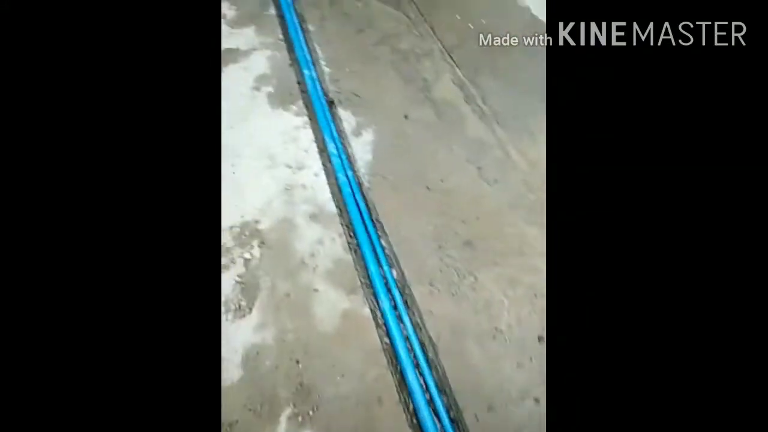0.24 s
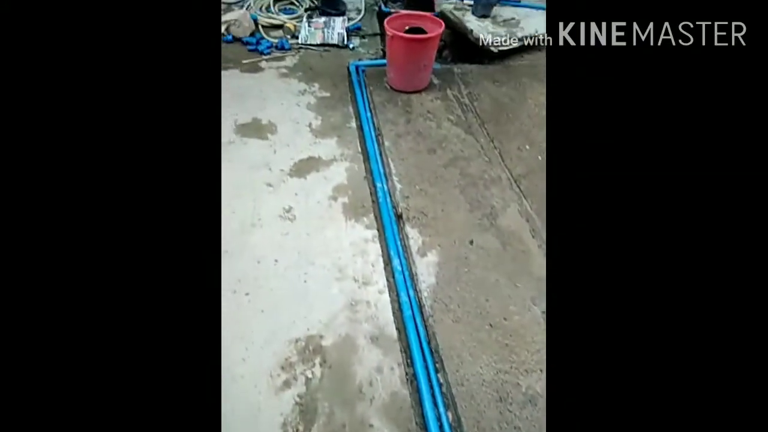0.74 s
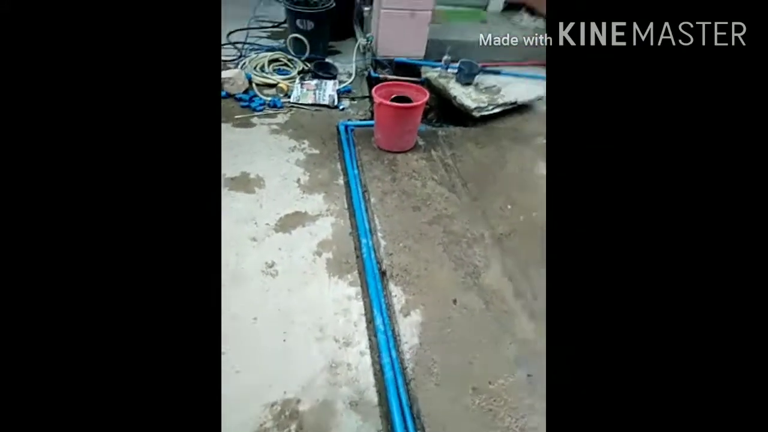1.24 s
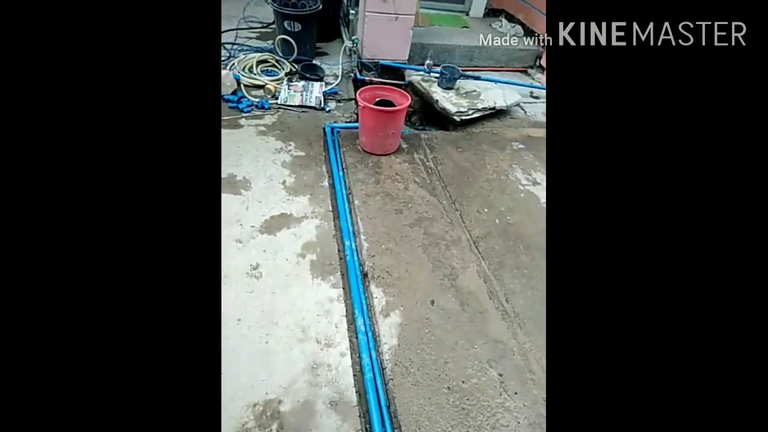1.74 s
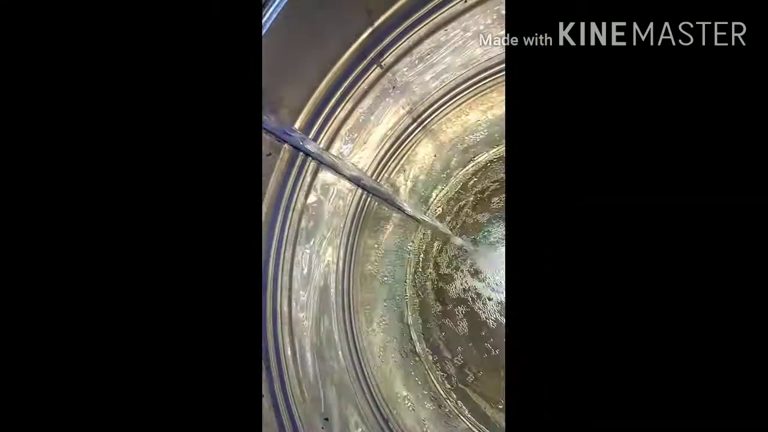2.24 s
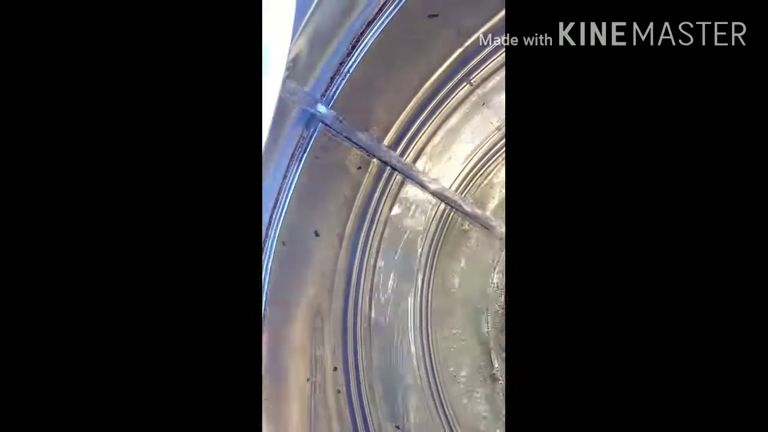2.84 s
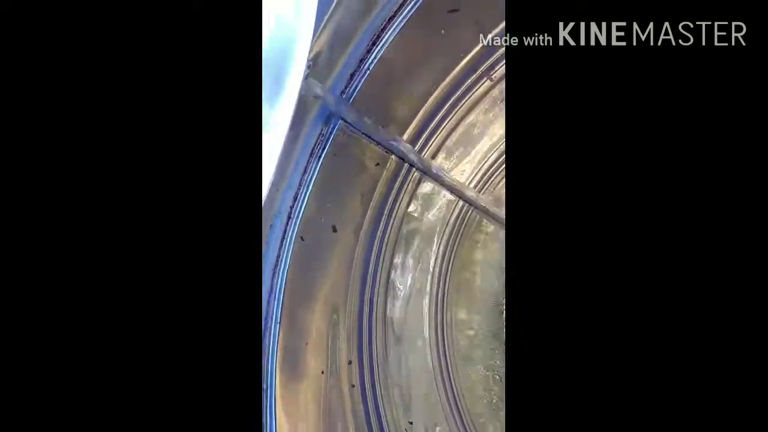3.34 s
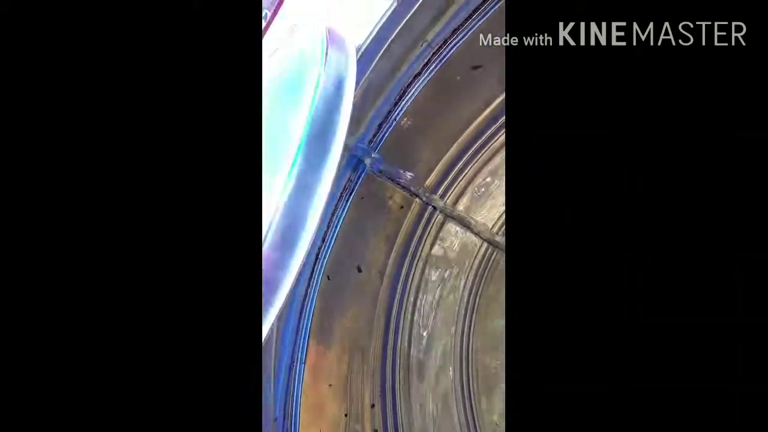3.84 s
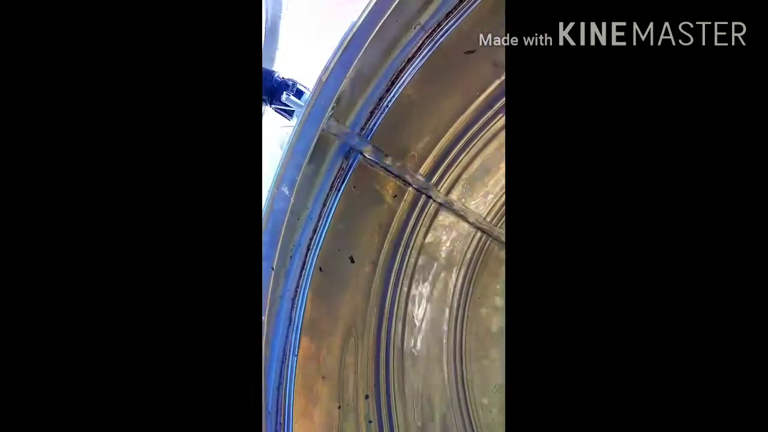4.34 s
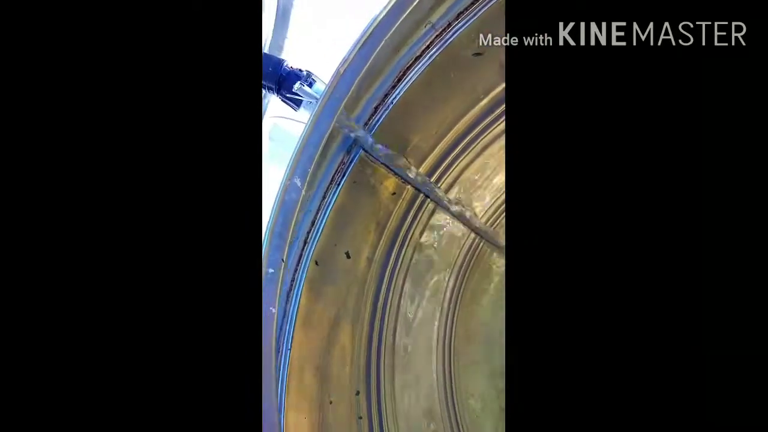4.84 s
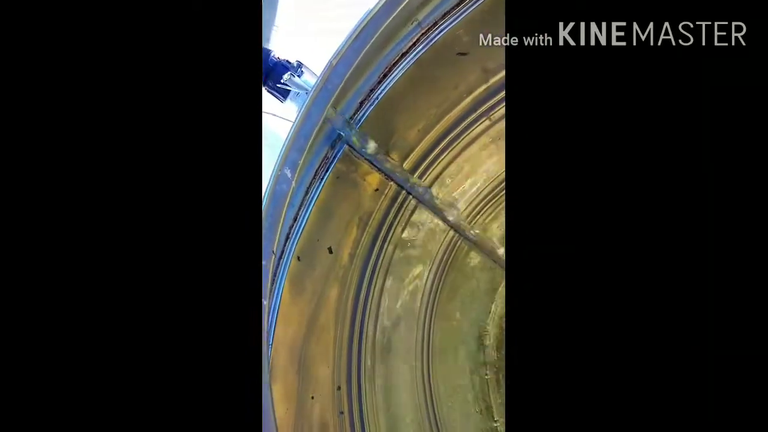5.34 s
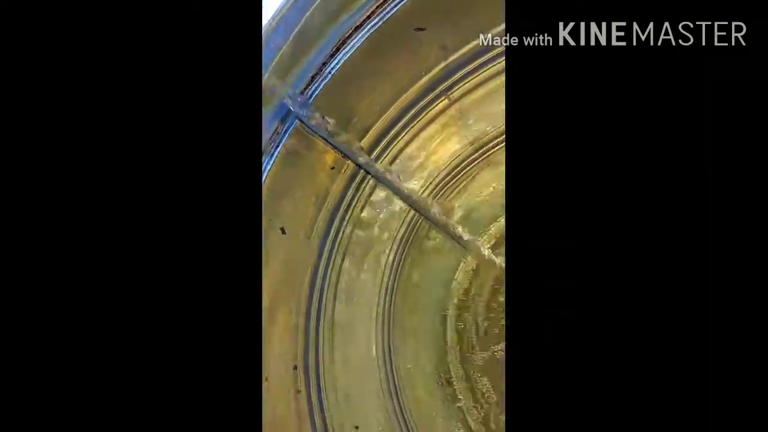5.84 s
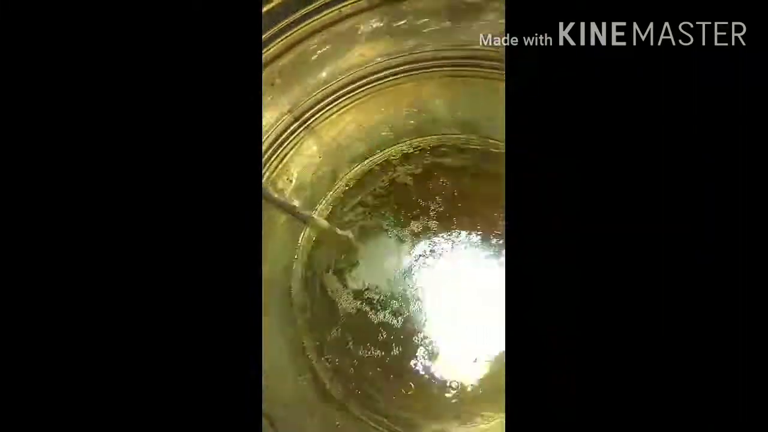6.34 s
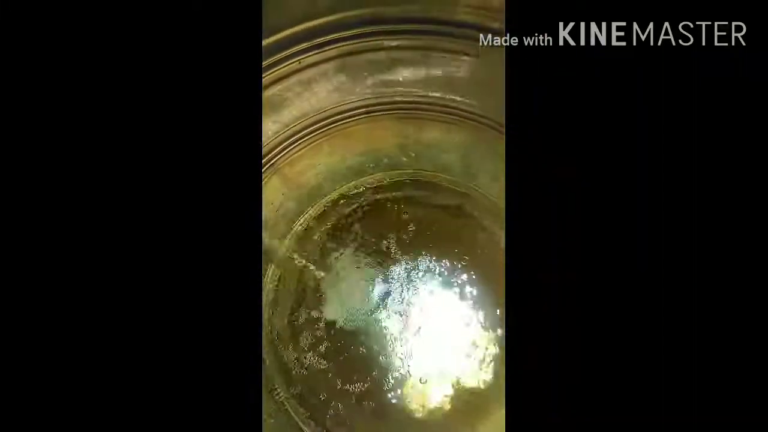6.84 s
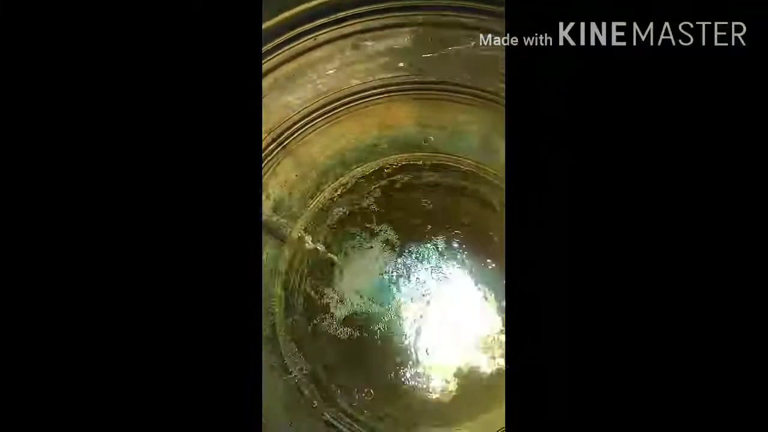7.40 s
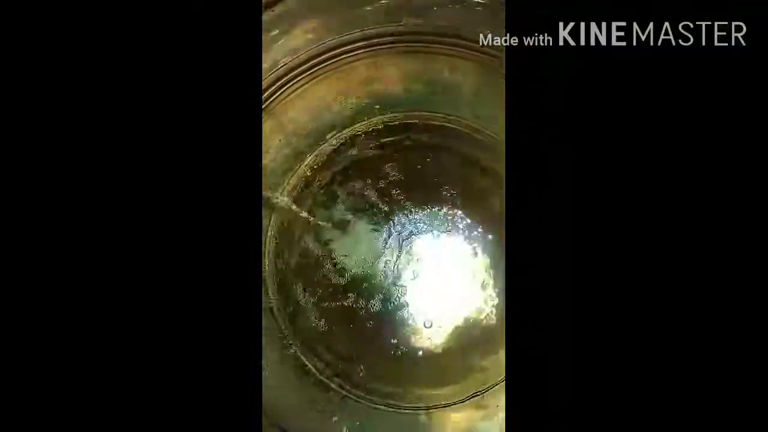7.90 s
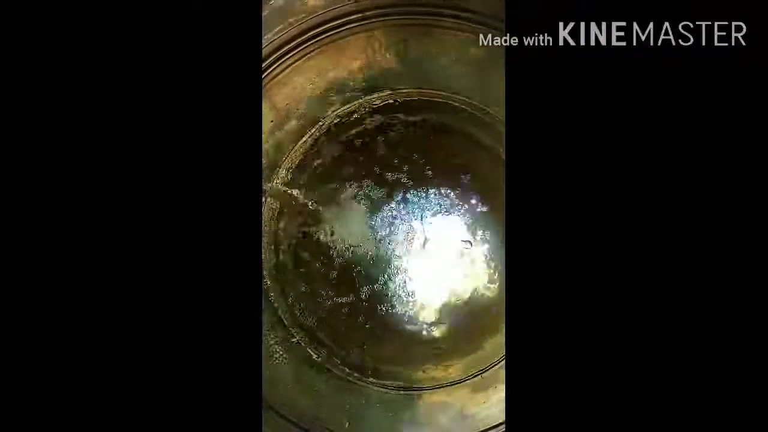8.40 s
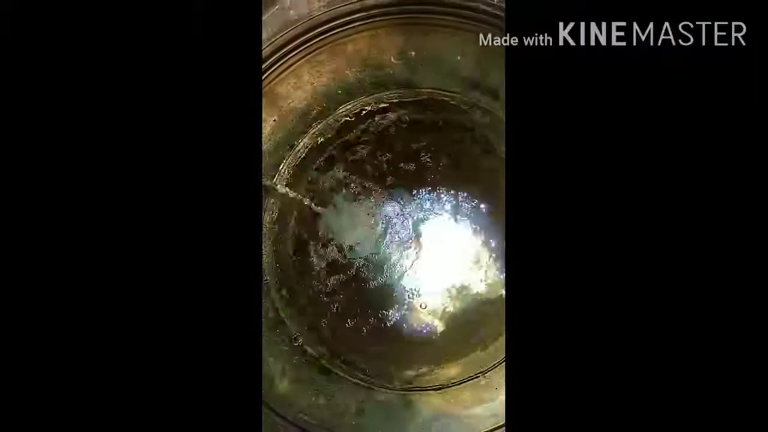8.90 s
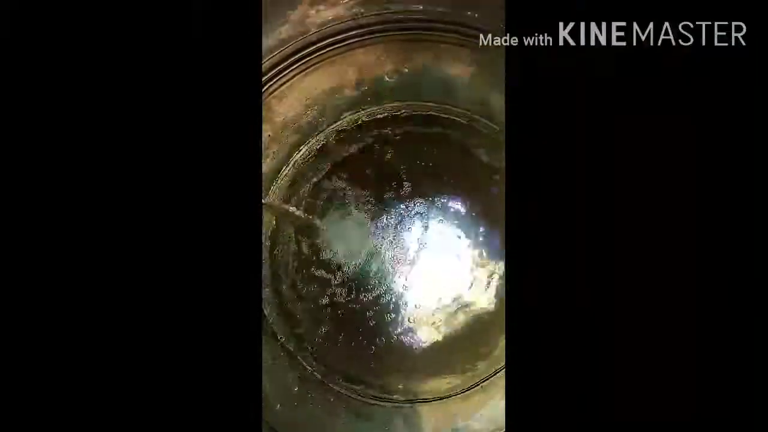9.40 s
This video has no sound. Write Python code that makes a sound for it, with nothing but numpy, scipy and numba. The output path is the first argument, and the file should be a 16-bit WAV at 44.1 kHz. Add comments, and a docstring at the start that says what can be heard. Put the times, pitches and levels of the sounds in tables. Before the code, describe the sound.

Soft mono hiss and far rumble with faint clicks last two seconds, then a short blank. Abruptly, close and wide, water plunges into a resonant metal tank: dense bright spray, uneven slaps, sudden airy gulps, sharp drop ticks near the phone, and a wavering low hum swelling with each plunge. Low wind buffets each side separately, growing into heavy thuds in the last few seconds. The splashing continues to the end.

```python
"""In a quiet yard, heard in mono: a water hiss turns away over distant rumble, with a few small taps.
After a short silence, stereo in the mouth of a steel tank, from the two microphone ports of a phone:
coloured noise makes the spray and slaps of a plunging jet, gliding tones its bubbles and close drops.
Band-passed noise and a wavering tone make the air in the tank sing and boom.
Low noise and falling tones make wind that buffets each port on its own."""
import sys
import numpy as np
from scipy import signal
from scipy.fft import rfft, irfft, next_fast_len
from scipy.io import wavfile
from scipy.ndimage import uniform_filter1d, minimum_filter1d
from numba import njit

SR = 44100
rng = np.random.default_rng(int(sys.argv[2]) if len(sys.argv) > 2 else 0)


def store_pcm(level_fs):
    """Save levels as 16-bit WAV."""
    pcm = np.round(np.clip(level_fs, -1, 1) * 32767).astype(np.int16)
    wavfile.write(sys.argv[1], SR, np.atleast_2d(pcm).T)


N = 426006

# Yard, distant murmur and water hiss: (time [s], murmur level [dB], hiss level [dB])
YARD_LEVELS = [(0, -39, -41), (.45, -41.5, -42.5), (.74, -43, -43), (.95, -41, -44), (1.4, -41.5, -44),
               (1.76, -42, -46), (1.94, -41.5, -44), (2.14, -41, -44.5)]
# Spectrum of the distant murmur: (frequency [Hz], relative density [dB per Hz])
MURMUR_SPECTRUM = [(18, -65), (30, -25), (106, -1.5), (168, -8), (281, -7.5), (401, -12), (550, -7),
                   (658, -10.5), (790, -1.5), (920, -11), (1180, -7), (1420, -13.5), (1950, -13),
                   (2200, -16), (2380, -11.5), (3400, -22), (4420, -39), (7480, -120)]
# Spectrum of the water hiss: (frequency [Hz], relative density [dB per Hz])
HISS_SPECTRUM = [(1800, -12), (2450, -25), (3200, 0), (3900, 2), (4200, -21), (4500, -1.5), (6000, 0),
                 (8000, 0.5), (11000, -2.5), (12500, -8), (15500, -13)]
# Bright band of the hiss, sweeping as the phone turns:
# (time [s], centre [Hz], width [Hz], band gain [dB], whistle gain [dB])
HISS_SWEEP = [(0, 10200, 1300, 9.5, 5.5), (.3, 9900, 1200, 10, 10), (.55, 10500, 1500, 10, 6),
              (.8, 10800, 1600, 2, 4), (1.0, 9900, 1500, 2, 2), (1.4, 10400, 1800, -1, -1),
              (1.7, 10100, 1200, 2, -1), (2.14, 9500, 1500, -5, -3)]
# Narrow whistles in the hiss: (centre [Hz], width [Hz], relative gain [dB])
HISS_WHISTLES = [(1440, 180, 4), (4160, 200, 2.5), (5840, 89, -7), (2360, 120, -9)]
# Small taps in the yard: (time [s], starting level [dB], starting pitch [Hz], T60 [s])
YARD_TAPS = [(0.296, -19, 3000, 0.002), (.297, -22, 4400, .002), (.785, -33, 1650, .02),
             (.80, -30, 1100, .012), (.803, -29, 1660, .02), (.815, -29, 1850, .012),
             (.827, -25, 1750, .015), (.829, -31, 1100, .008), (1.93, -30, 3100, .008),
             (1.961, -31, 2710, .008), (1.984, -32, 3020, .008), (2.029, -31, 2900, .008)]
WHISTLE_DRIFT, WHISTLE_WAVER_DB = .01, 2  # share of the pitch; level
YARD_END_S, TANK_START_S, TANK_FADE_S = 2.14, 2.268, .012

# Wind at the two ports: (time [s], relative left level [dB], relative right level [dB])
WIND_LEVELS = [(2.28, -59, -56), (2.45, -45, -31), (2.75, -43, -36), (3.1, -40, -34), (3.45, -52, -54),
               (3.8, -41, -37.5), (4.05, -30.5, -42.5), (4.25, -35, -28.5), (4.45, -39, -40),
               (4.58, -39, -36), (4.68, -27, -22.5), (4.78, -31, -28), (4.88, -40, -34), (5.0, -25, -22),
               (5.1, -33, -28), (5.22, -33, -27.5), (5.4, -42, -31), (5.58, -33, -27.5), (5.7, -32, -24.5),
               (5.82, -31, -26), (6.04, -33, -27.5), (6.3, -37, -43), (6.44, -33.5, -44), (6.75, -50, -38),
               (7.0, -29.5, -28), (7.24, -36, -31.5), (7.48, -26.5, -22), (7.7, -26.5, -28.5),
               (7.9, -29.5, -25.5), (8.2, -33.5, -29), (8.36, -28, -20.5), (8.56, -21.5, -17),
               (8.68, -27.5, -17), (8.8, -23.5, -40), (8.9, -30, -26.5), (9.0, -33, -25),
               (9.24, -32.5, -36), (9.4, -27.5, -20), (9.55, -34, -30), (9.66, -29, -30)]
# Strongest eddies against a port:
# (time [s], relative level [dB], starting pitch [Hz], port [0 left, 1 right])
WIND_POPS = [(2.658, -13, 294, 1), (4.139, -11, 237.2, 0), (4.171, -11, 318, 1), (4.26, -14, 275, 1),
             (4.662, -10, 250.7, 0), (4.663, -12, 217, 1), (4.733, -13, 280, 0), (4.895, -16, 255, 1),
             (4.968, -10, 228, 1), (5.014, -5, 130, 1), (5.065, -9, 140, 1), (5.107, -8, 190, 1),
             (5.2, -9, 200, 1), (5.46, -13, 300, 1), (5.657, -6, 198, 1), (5.675, -11, 298, 0),
             (5.732, -6, 207, 1), (6.002, -12, 241, 1), (6.994, -7, 403, 1), (7.385, -2.5, 256.7, 1),
             (7.461, -4, 324, 1), (7.532, -10, 195, 0), (7.533, -3, 229, 1), (7.615, -7.5, 317, 1),
             (7.671, -2, 317, 1), (7.708, -11, 248, 1), (7.825, -3, 240.3, 1), (7.86, -3, 235, 1),
             (7.935, -3.5, 226, 1), (8.048, -12, 246, 1), (8.162, -10, 240, 1), (8.178, -13, 260, 1),
             (8.257, -5.5, 230, 1), (8.358, -6, 294, 1), (8.377, -13, 204, 0), (8.478, -6, 334, 1),
             (8.505, -3, 245, 1), (8.527, -7, 317, 0), (8.562, -3, 332, 1), (8.625, 2, 278, 1),
             (8.673, -7, 335, 1), (8.79, -7, 204.4, 0), (8.799, -14, 250, 1), (8.9, -7, 251, 1),
             (8.98, -11, 260, 1), (9.179, -10, 260, 1), (9.31, -9, 250, 1), (9.359, -4, 285, 1),
             (9.388, -6, 293, 1), (9.435, -10, 230.4, 1), (9.524, -10, 232, 1)]
GUST_DB, GUSTS_PER_S = 1.24, 14  # chance gusts at each port
SMALL_POP_DB, SMALL_POP_HZ = 13, 198  # strongest small pop over the wind table, lowest starting pitch
POP_CYCLES = 5.6  # T60 of a pop, in cycles of its starting pitch
# each pop also throws a short rough puff
PUFF_DB, PUFF_HZ, PUFF_WIDTH_HZ, PUFF_T60_S = -11, 408, 490, 0.052

# Lowest air mode of the tank between swells: (time [s], pitch [Hz], relative level [dB])
BOOM_COURSE = [(2.27, 223, -37), (2.5, 220.8, -27), (3.1, 219.5, -34.5), (3.5, 223.7, -28.5),
               (4.3, 224, -30.5), (5, 225.9, -26), (5.6, 230.2, -30.5), (6.5, 229.7, -29),
               (7, 224.9, -28.5), (7.6, 232.4, -27.5), (8.3, 233.8, -36), (8.8, 224.8, -28.5),
               (9.66, 226.4, -26.5)]
# Swells of the boom as slugs of water plunge: (time of the top [s], relative level [dB])
BOOM_SWELLS = [(2.301, -32), (2.43, -24), (2.55, -21), (2.65, -21.5), (2.77, -19), (2.85, -33),
               (3.091, -20), (3.2, -20.5), (3.28, -20), (3.39, -15.5), (3.45, -22), (3.52, -32),
               (4.14, -22), (4.285, -19), (4.41, -29), (4.53, -28), (4.68, -18), (4.73, -24), (4.8, -22),
               (4.845, -24), (4.91, -27), (4.99, -21), (5.21, -25), (5.3, -23), (5.38, -26), (5.44, -26),
               (5.73, -28), (6.2, -23), (6.41, -29), (6.57, -21.5), (6.74, -17), (6.88, -27), (7.0, -29),
               (7.42, -17), (7.54, -27), (7.63, -24), (7.72, -27), (7.83, -34), (8.3, -21), (8.47, -13),
               (9.1, -30), (9.18, -25), (9.43, -23)]
SWELL_RISE_S, SWELL_FALL_S, BOOM_WANDER_DB = 0.02, 0.028, 2.5

# Single drops near the phone:
# (time [s], mean starting level [dB], starting pitch [Hz], left minus right [dB])
CLOSE_DROPS = [(2.9617, -2, 7560, 1), (3.162, -6, 7690, 0.5), (3.3062, -2, 7300, -1.0),
               (3.5062, -8, 7160, -1.5), (3.578, -3, 7500, -2.0), (3.8963, 0, 7200, 7),
               (4.0076, -4, 7910, -0.5), (4.26, -10, 6860, 1.0), (4.308, -7, 6000, 2.5),
               (4.4087, -3, 6920, 1.5), (4.4386, 1, 7600, 5), (4.657, -6, 6440, 2.0), (5.0522, -6, 8000, 3),
               (5.1086, -12, 6610, 1.5), (5.2188, -10, 7250, 1.5), (5.2837, -6, 7260, 3.0),
               (5.4218, -8, 5400, 3.0), (5.59, -10, 7420, 0.5), (5.6733, -8, 7360, 0.0),
               (5.75, -9, 5600, 1.5), (6.1302, -12, 7600, 1), (6.1781, -8, 5860, -1.5),
               (6.5104, -8, 7440, -0.5), (6.5812, -9, 6910, -1.0), (6.6491, -7, 7500, -2.5),
               (6.8908, -7, 5990, 4), (7.1584, -7, 8100, -0.5), (7.663, -7, 6400, 1),
               (8.449, -10, 7360, -1.5), (8.523, -6, 7200, -3.5), (8.5767, 2, 7540, -2.0),
               (8.6675, -9, 7240, -1.0), (8.9234, -2, 7540, -1.5), (9.08, -7, 7550, -3.5),
               (9.2043, -10, 6600, 0), (9.4537, -6, 5740, -1.5), (9.5101, -5, 7470, -7)]
DROP_T60_S, DROP_GLIDE = 0.011, 0.147
SPATTER_PER_S, SPATTER_DB, SPATTER_HZ = 40, -14, 5210  # chance drops: rate, top level, lowest pitch

# Higher air modes of the tank: (frequency [Hz], width [Hz], relative left level [dB],
# relative right level [dB], polarity of left against right [+1 or -1])
TANK_MODES = [(335, 17.4, 2.5, 2, 1), (439, 37, 1, -1.5, 1), (513, 18, -7, -3.5, 1), (556, 49, -3, -11, 1),
              (613, 44, -8.5, -18, 1), (675, 37, 0, 1, 1), (773, 24, -4, -8, 1), (843, 15, -10, -0.5, -1),
              (890, 11, -2, 0, -1), (959, 17, -19, -2.5, -1), (1081, 20, -25, 1, -1),
              (1154, 9.2, -5, -11, 1), (1244, 26, -2.5, -8, -1), (1342, 14, -10.5, 3.5, -1),
              (1519, 72, -2, -4, 1), (1691, 26.3, -2, -11, 1), (1838, 30, -6.5, -4.5, 1),
              (2082, 50, -3, -3, 1), (2233, 90, 3, -10, -1), (2482, 34, 1, -12, 1), (2786, 88, -2, -22, -1)]
MODE_WANDER_DB, MODE_WANDERS_PER_S = 4, 16  # the churning surface feeds each mode unevenly
MODE_DRIFT, MODE_DRIFTS_PER_S = 0.014, 3  # the moving surface shifts each pitch by about this share

# Gulps of air bursting out of the plunge: (time [s], relative starting level [dB], centre [Hz])
AIR_GULPS = [(2.428, -4, 2000), (2.652, -14, 1540), (2.9453, -35, 1560), (3.424, -29, 2076),
             (3.749, -8, 1570), (4.261, -15, 1530), (4.48, -18, 1200), (4.66, -28, 2049),
             (5.219, -18, 2100), (5.1, -25, 1500), (5.8369, -10.5, 1400), (6.121, -20, 864),
             (6.243, -17, 2373), (6.3782, -9, 1930), (7.007, -11, 1650), (7.8405, -17, 1580),
             (8.0202, -4, 2084), (8.719, -13.5, 980), (8.75, -10, 1560), (8.783, -12, 1540),
             (9.16, -12.5, 1210), (9.18, -21, 1500), (9.21, -13, 2000)]
GULP_T60_S, GULP_CRACK_DB, GULP_CRACK_T60_S = 0.22, 4.5, 0.013

# Jet into the water: (time [s], relative spray level [dB], relative plunge level [dB])
JET_LEVELS = [(2.27, -26, -40), (2.3, -18.5, -35.5), (2.44, -12.5, -28.5), (2.7, -13.5, -23.5),
              (2.9, -13.5, -29), (3.28, -16.0, -22), (3.56, -14.5, -26.5), (4.08, -13, -25.5),
              (4.3, -17, -28.5), (4.8, -16, -27.5), (5.35, -14.5, -26.5), (5.6, -17, -27.5),
              (6.2, -14, -26), (6.55, -16, -29.0), (7.1, -16, -26), (7.45, -12.5, -31.5), (7.7, -12, -23.5),
              (7.8, -16.5, -29), (7.92, -11.5, -22.5), (7.99, -19.5, -31.5), (8.05, -15.5, -23),
              (8.2, -12, -26), (8.5, -14.5, -26), (8.75, -12, -28.5), (9.3, -13, -23), (9.66, -18, -30)]
# Lumps of the jet slapping the surface: (time [s], relative peak level [dB], hold [s])
JET_SLAPS = [(2.418, -17, 0.004), (2.5, -13, 0.016), (2.55, -18, 0.015), (2.666, -10, 0.015),
             (2.75, -14.7, 0.004), (2.8056, -27, 0.015), (2.843, -6, 0.004), (2.956, -13, 0.004),
             (3.01, -19, 0.045), (3.093, -13, 0.004), (3.1624, -8.5, 0.028), (3.218, -11, 0.004),
             (3.266, -13, 0.042), (3.303, -1, 0.004), (3.3857, -12, 0.052), (3.504, -12, 0.004),
             (3.577, -17, 0.0044), (3.68, -15, 0.014), (3.797, -20, 0.015), (3.895, -11, 0.004),
             (4.008, -7.5, 0.0037), (4.087, -5, 0.004), (4.166, -7, 0.004), (4.21, -15, 0.016),
             (4.258, -7.5, 0.016), (4.306, -12, 0.012), (4.3725, -22, 0.046), (4.396, -12.5, 0.043),
             (4.433, -9, 0.013), (4.475, -16, 0.004), (4.534, -17, 0.046), (4.6015, -17, 0.015),
             (4.658, -5, 0.024), (4.6894, -21, 0.004), (4.7352, -11.5, 0.004), (4.818, -17, 0.079),
             (4.919, -11, 0.004), (4.988, -18, 0.027), (5.044, -15, 0.004), (5.106, -11, 0.027),
             (5.176, -18, 0.004), (5.217, -10, 0.013), (5.282, -10.2, 0.016), (5.365, -19, 0.017),
             (5.424, -14, 0.0036), (5.4556, -19.5, 0.075), (5.519, -4, 0.0044), (5.555, -12, 0.035),
             (5.588, -2, 0.004), (5.623, -13, 0.045), (5.674, -10, 0.0044), (5.7509, -14, 0.004),
             (5.8025, -13, 0.004), (5.867, -12, 0.0044), (5.9365, -19, 0.014), (5.995, -17, 0.027),
             (6.119, -16, 0.008), (6.133, -16, 0.02), (6.176, -6, 0.015), (6.215, -22, 0.0041),
             (6.34, -23, 0.045), (6.509, -6, 0.0036), (6.581, -8, 0.004), (6.647, -14, 0.0036),
             (6.698, -17, 0.017), (6.755, -17, 0.014), (6.86, -17, 0.015), (6.889, -14, 0.004),
             (6.955, -19, 0.075), (7.041, -15, 0.015), (7.155, -16, 0.0038), (7.325, -20, 0.004),
             (7.418, -2, 0.004), (7.49, -14, 0.004), (7.57, -16, 0.0044), (7.662, -9, 0.004),
             (7.903, -19, 0.004), (7.931, -2.5, 0.0043), (8.009, -12, 0.03), (8.21, -9.1, 0.004),
             (8.2672, -14, 0.042), (8.4468, -11, 0.019), (8.5226, -8.5, 0.015), (8.575, 0, 0.029),
             (8.66, -11, 0.0043), (8.743, -14, 0.018), (8.853, -8, 0.0039), (8.918, -3, 0.014),
             (9.084, -7.5, 0.0045), (9.204, -14.5, 0.047), (9.2906, -17, 0.079), (9.354, -16, 0.004),
             (9.423, -14, 0.035), (9.45, -12.5, 0.061), (9.508, -6, 0.0035), (9.584, -14, 0.052)]
# Spray at each port before the port resonance:
# (frequency [Hz], relative left density [dB per Hz], relative right density [dB per Hz])
SPRAY_SPECTRA = [(231.5, 11, -57), (570, -48, -21), (960, -5.5, -32), (1500, -2.5, 0), (2660, -8.5, -0.5),
                 (3000, 1, -3), (4100, -3, -2.5), (5940, 0, 0), (7760, -4.5, 6.5), (8900, -2, 2),
                 (11050, -1.5, -6), (15500, -4.5, -15)]
SPRAY_SURGE_DB, PLUNGE_SURGE_DB = 1.23, 2  # chance surges in the flow
NOISE_CREST_DB = 11  # allowance for noise peaks over the rms level
SLAP_T60_S, SLAP_CRACK_DB, SLAP_CRACK_T60_S = 0.14, -15, 0.011
SLAP_PLUNGE_DB = -21.5  # share of a slap that reaches the plunge

RIGHT_PORT_HZ, RIGHT_PORT_WIDTH_HZ, RIGHT_PORT_DB = 7450, 500, 3.5
LEFT_PORT_WIDTH_HZ = 1950
# the grip shades the left port more and more: pairs run from the tank's start towards the end
GRIP_HZ, GRIP_SETTLE_S = (8600, 6170), 1.47
GRIP_PEAK_DB, GRIP_TOP_DB = (10.5, 3.5), (2, -5.5)
TANK_TOP_HZ, TOP_HZ = 14280, 15550  # low-pass corners of the tank input and of the whole


def undb(db):
    """Gain of a level in dB."""
    return np.exp(np.asarray(db) * (np.log(10) / 20))


def unit(x):
    """Scale to rms 1."""
    return x / np.sqrt(np.mean(x ** 2))


def curves(table):
    """Columns of a table joined by straight lines in time."""
    s, *columns = np.transpose(table)
    return [np.interp(np.arange(N) / SR, s, c) for c in columns]


def colour(x, hz, db):
    """Filter x with a response drawn on a log-frequency axis."""
    n = next_fast_len(N)
    log_f = np.log(np.arange(n // 2 + 1) * SR / n + 1)
    response = undb(np.interp(log_f, np.log(hz), db, left=-70))
    return irfft(rfft(x, n) * response, n)[:N]


def butter(x, order, hz, kind="low"):
    """Smooth low-pass or high-pass with its corner at hz."""
    return signal.sosfilt(signal.butter(order, hz, kind, fs=SR, output="sos"), x)


@njit
def svf(x, hz, width):
    """State-variable band-pass with moving centre, gain 1 at the centre."""
    y, b, l = np.empty(len(x)), 0., 0.
    for i in range(len(x)):
        g, k = np.tan(np.pi * hz[i] / SR), width[i] / hz[i]
        v = (b + g * (x[i] - l)) / (1 + g * (g + k))
        b, l, y[i] = 2 * v - b, l + 2 * g * v, k * v
    return y


def band(x, hz, width_hz):
    """Band-pass with numbers or curves."""
    return svf(x, hz + np.zeros(N), width_hz + np.zeros(N))


def walk(rate):
    """Random levels held 1 / rate s and smoothed twice; spread near 1."""
    k = int(SR / rate)
    steps = np.repeat(rng.standard_normal(N // k + 1), k)
    return 1.3 * uniform_filter1d(uniform_filter1d(steps, k), k)[:N]


def die(hits, t60):
    """Let each hit decay exponentially, by 60 dB in t60 s."""
    return signal.lfilter([1], [1, -1000. ** (-1 / (t60 * SR))], hits)


def rings(rows, glide):
    """Decaying tones (s, gain, Hz, t60 s): pitch rises with positive glide, falls with negative."""
    out, t = np.zeros(N + SR // 8), np.arange(SR // 8) / SR
    for s, gain, hz, t60 in rows:
        i, u = int(s * SR), t[:int(min(t60, .12) * SR)]
        tone = np.sin(2 * np.pi * hz * u * (1 + glide * u / t60))
        out[i:i + len(u)] += gain * tone * np.exp(-np.log(1000) * u / t60)
    return out[:N]


def droplets(spread_db):
    """Dense impacts of uneven size: noise with a heavy tail."""
    noise = rng.standard_normal(N)
    size = np.minimum(rng.exponential(size=N // 32 + 1), 4.5)
    gain = np.repeat(undb(spread_db * size), 32)
    return unit(noise * uniform_filter1d(gain, 32)[:N])


def flutter(x, depth_db, rate):
    """Patchy noise: each narrow band's level wavers at random on its own."""
    _, _, z = signal.stft(x, nperseg=512)
    patches = uniform_filter1d(rng.standard_normal(z.shape), size=2, axis=0)
    patches = uniform_filter1d(patches, size=int(SR / 256 / rate), axis=1)
    return unit(signal.istft(z * undb(depth_db * unit(patches)), nperseg=512)[1][:N])


def yard():
    """Rumble and murmur, a water hiss with a sweeping bright band and whistles, and a few taps."""
    murmur_db, hiss_db = curves(YARD_LEVELS)
    bright_hz, width_hz, bright_db, whistle_db = curves(HISS_SWEEP)
    murmur = flutter(rng.standard_normal(N), 1.5, 14)
    murmur = unit(colour(murmur, *np.transpose(MURMUR_SPECTRUM)))
    water = flutter(droplets(0.88), 1.8, 6)
    hiss = colour(water, *np.transpose(HISS_SPECTRUM))
    hiss = hiss + undb(bright_db) * band(hiss, bright_hz, width_hz)
    whistles = np.zeros(N)
    for hz, width, db in HISS_WHISTLES:
        gain = undb(db + WHISTLE_WAVER_DB * walk(25.1))
        whistles += gain * band(water, hz * (1 + WHISTLE_DRIFT * walk(5)), width)
    hiss = unit(hiss + undb(whistle_db) * whistles)
    taps = rings([(s, undb(db), hz, t60) for s, db, hz, t60 in YARD_TAPS], 0.07)
    mix = murmur * undb(murmur_db) + hiss * undb(hiss_db) + taps
    return mix * (np.arange(N) < YARD_END_S * SR)


def puffs(rows):
    """Short rough noise bursts with each pop (s, level dB, Hz)."""
    hits = np.zeros(N)
    for s, db, _ in rows:
        hits[int(s * SR)] += undb(db + PUFF_DB)
    noise = band(rng.standard_normal(N), PUFF_HZ, PUFF_WIDTH_HZ)
    noise = band(noise, PUFF_HZ, PUFF_WIDTH_HZ)
    return unit(noise) * die(hits, PUFF_T60_S)


def wind():
    """Eddies hit each port on their own: stronger gusts reach higher, and pops fall in pitch."""
    out = []
    for port, (db, centre_hz, reach_hz) in enumerate(zip(curves(WIND_LEVELS), (72, 105), (75, 140))):
        db = db + GUST_DB * np.minimum(walk(GUSTS_PER_S), 1.5)
        eddy = undb(3.1 * np.minimum(walk(40), 1.8))
        width = reach_hz * (1 + 4.1 * np.minimum(undb(db) * eddy, .5))
        rumble = band(rng.standard_normal(N), centre_hz, width)
        rumble = band(band(rumble, 72, 1.36 * width), 193, 1.43 * width)
        rumble = unit(rumble * eddy / np.sqrt(width))
        rows = [row[:3] for row in WIND_POPS if round(row[3]) == port]
        for when, size, pitch in rng.random((40, 3)):
            level_db = db[int(when * N)] + SMALL_POP_DB - 8 * size
            rows.append((when * N / SR, level_db, SMALL_POP_HZ * 1.7 ** pitch))
        pops = rings([(s, undb(p + 8.5), hz, POP_CYCLES / hz) for s, p, hz in rows], -0.33)
        buffet = undb(db + 9.0) * rumble + pops + puffs(rows)
        # the microphone passes little under its low corner
        out.append(butter(buffet, 3, 58, "high"))
    return np.array(out)


def swells():
    """Each swell of the boom rises quickly to its top and dies away."""
    t, out = np.arange(-SR // 4, SR // 4) / SR, np.zeros(N + SR // 2)
    shape = np.exp(-(t / np.where(t < 0, SWELL_RISE_S, SWELL_FALL_S)) ** 2)
    for s, db in BOOM_SWELLS:
        i = int(s * SR) - SR // 4
        out[i:i + len(t)] += undb(db) * shape
    return out[:N]


def boom():
    """The lowest mode is kept going by the plunge: a wavering tone, nearly alike at both ports."""
    hz, db = curves(BOOM_COURSE)
    phase = 2 * np.pi * np.cumsum(hz + 8 * walk(40)) / SR
    tone = np.sqrt(2) * np.sin(phase) * undb(1.2 * walk(30))
    # narrow noise around the tone, separate at each port
    skirt = np.array([unit(band(rng.standard_normal(N), hz, 46)) for _ in range(2)])
    level = undb(db + BOOM_WANDER_DB * walk(15)) + swells()
    return level * (0.82 * tone + 0.46 * skirt) * undb([[-.4], [.4]])


def drops():
    """Short bright rising ticks, some listed and the rest by chance, louder at the nearer port."""
    when, size, pitch, side = rng.random((int(SPATTER_PER_S * N / SR), 4)).T
    spatter = np.c_[when * N / SR, SPATTER_DB - 8 * size, SPATTER_HZ * 1.8 ** pitch, 12 * (side - .5)]
    rows = np.r_[CLOSE_DROPS, spatter]
    out = []
    for sign in (1, -1):  # left, right
        ticks = [(s, undb(db + sign * pan_db / 2), hz, DROP_T60_S) for s, db, hz, pan_db in rows]
        out.append(rings(ticks, DROP_GLIDE))
    return np.array(out)


def gulps():
    """Sudden noise bursts around each gulp's centre, dying fast, each opened by a ringing crack."""
    out, t = np.zeros(N + SR // 4), np.arange(SR // 4) / SR
    for s, db, hz in AIR_GULPS:
        throat = signal.iirpeak(hz, 2.1, SR)
        noise = rng.standard_normal(len(t))
        burst = unit(signal.lfilter(*throat, signal.lfilter(*throat, noise)))
        i = int(s * SR)
        out[i:i + len(t)] += undb(db) * burst * 1000. ** (-t / GULP_T60_S)
    cracks = [(s, undb(db + GULP_CRACK_DB), hz, GULP_CRACK_T60_S) for s, db, hz in AIR_GULPS]
    return out[:N] + rings(cracks, 0.1)


def slaps():
    """Gain of the slaps: each lifts the spray at once with a crack, holds and sinks back."""
    hits, ends = np.zeros(N), np.zeros(N)
    for s, db, hold_s in JET_SLAPS:
        gain = undb(db - NOISE_CREST_DB)
        hits[int(s * SR)] += gain
        ends[min(int((s + hold_s) * SR), N - 1)] += gain
    held = np.cumsum(hits - ends)
    return held + die(ends, SLAP_T60_S) + undb(SLAP_CRACK_DB) * die(hits, SLAP_CRACK_T60_S)


def bubbles(count, low_hz, span, cycles):
    """Air dragged under by the jet rings at chance pitches; higher rings die sooner."""
    when, pitch, size = rng.random((count, 3)).T
    hz = low_hz * span ** pitch
    return unit(rings(np.c_[when * N / SR, undb(-16 * size), hz, cycles / hz], 0.12))


def grip():
    """Left port resonance settles lower while its peak and the top fade evenly in dB."""
    t = np.maximum(np.arange(N) / SR - TANK_START_S, 0)
    hz = GRIP_HZ[1] + (GRIP_HZ[0] - GRIP_HZ[1]) * np.exp(-t / GRIP_SETTLE_S)
    return [hz] + [a + (b - a) * t / t[-1] for a, b in (GRIP_PEAK_DB, GRIP_TOP_DB)]


def port_resonance(high, port):
    """Each microphone port lifts its own band; the left one changes with the grip."""
    if port == 1:
        return high + (undb(RIGHT_PORT_DB) - 1) * band(high, RIGHT_PORT_HZ, RIGHT_PORT_WIDTH_HZ)
    left_hz, left_db, top_db = grip()
    top = butter(high, 2, 9000, "high")
    peak = band(high, left_hz, LEFT_PORT_WIDTH_HZ)
    return high + (undb(top_db) - 1) * top + (undb(left_db) - 1) * peak


def tank_modes(drive, port, feed, pitch):
    """Air modes of the tank as narrow resonances driven by the plunge."""
    out = np.zeros(N)
    for j, (_, width_hz, *levels_db, polarity) in enumerate(TANK_MODES):
        sign = np.sign(polarity) if port == 0 else 1
        # delay the shared noise differently for each mode, so neighbours do not cancel
        mode = band(np.roll(drive, 613 * j), pitch[j], width_hz)
        out += sign * undb(levels_db[port]) * feed[j] * mode
    return out


def jet():
    """Spray and plunge at both ports, through tank modes and port resonances."""
    spray_db, plunge_db = curves(JET_LEVELS)
    hz, *ports_db = np.transpose(SPRAY_SPECTRA)
    lift = slaps()
    flow = undb(spray_db - 4.0 + SPRAY_SURGE_DB * walk(11)) + lift
    churn = undb(plunge_db + 0.47 + PLUNGE_SURGE_DB * walk(14)) + undb(SLAP_PLUNGE_DB) * lift
    shared = 0.86 * droplets(3.7) + 0.3 * bubbles(count=1600, low_hz=799, span=4.06, cycles=42.0)
    burst = gulps()
    feed = [undb(MODE_WANDER_DB * np.minimum(walk(MODE_WANDERS_PER_S), 0.8)) for _ in TANK_MODES]
    pitch = [m[0] * (1 + MODE_DRIFT * walk(MODE_DRIFTS_PER_S)) for m in TANK_MODES]
    out = []
    for port in range(2):
        # reflections in the tank scramble the fine detail, so each port gets its own spray
        fizz = bubbles(count=1800, low_hz=1500, span=5.54, cycles=108)
        spray = flutter(droplets(1.5) + 0.18 * fizz, 4.2, 18)
        rush = colour(spray, hz, ports_db[port])
        low = butter(rush, 2, 3100)
        high = port_resonance(rush - low, port)
        drive = shared + 0.5 * rng.standard_normal(N)
        modes = tank_modes(drive, port, feed, pitch)
        hiss = undb([1.6, 1.4][port]) * flow * unit(high)
        plunge = churn * (undb(6.5) * low + undb(13.0) * modes)
        # gulps reach the left port 12 samples after the right
        gulp = undb([-5.5, -4.5][port]) * np.roll(burst, [12, 0][port])
        out.append(hiss + plunge + gulp)
    return np.array(out)


def limit(x):
    """Both channels duck together around any peak over full scale."""
    need = np.minimum(1 / np.maximum(np.abs(x).max(axis=0), 1e-9), 1)
    return x * uniform_filter1d(minimum_filter1d(need, size=401), size=400)


def scene():
    """Yard, silence, then the tank fading in through a limiter and a duller input."""
    fade = np.clip((np.arange(N) / SR - TANK_START_S) / TANK_FADE_S, 0, 1)
    tank = limit((wind() + boom() + drops() + jet()) * fade)
    dull = signal.ellip(10, .2, 60, TANK_TOP_HZ, fs=SR, output="sos")
    return yard() + signal.sosfilt(dull, tank)


def record(dry):
    """Anything over full scale clips, before and after the top is cut."""
    top_cut = signal.ellip(10, .2, 70, TOP_HZ, fs=SR, output="sos")
    return np.clip(signal.sosfilt(top_cut, np.clip(dry, -1, 1)), -1, 1)


dry = scene()
out = record(dry)
store_pcm(out)
```